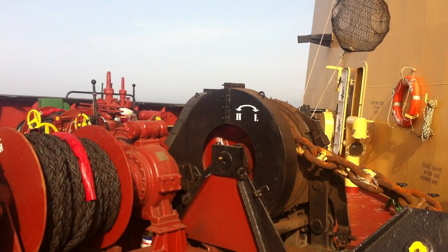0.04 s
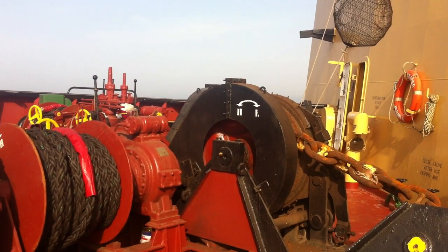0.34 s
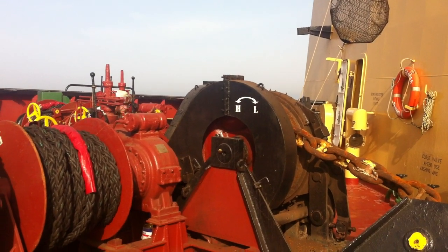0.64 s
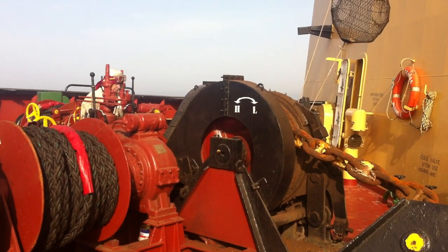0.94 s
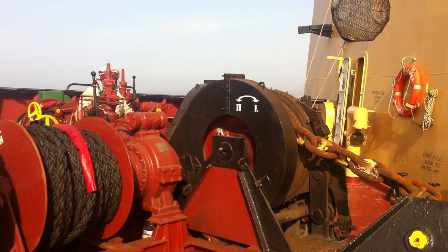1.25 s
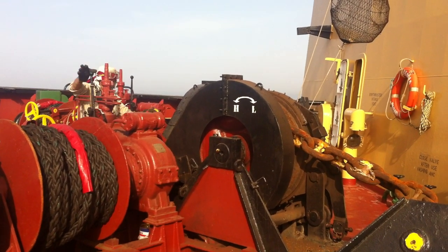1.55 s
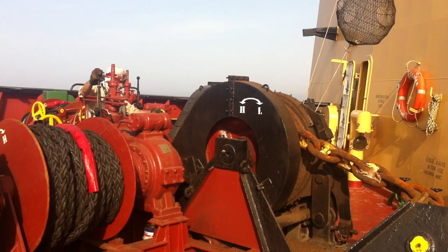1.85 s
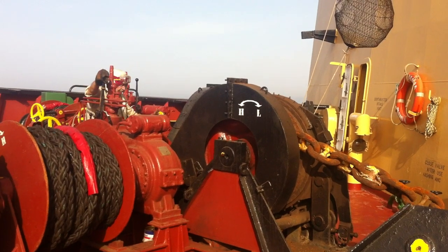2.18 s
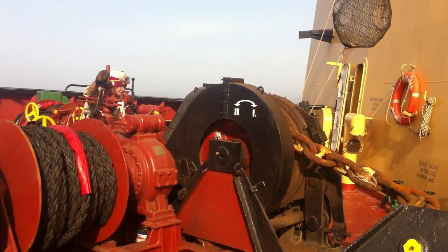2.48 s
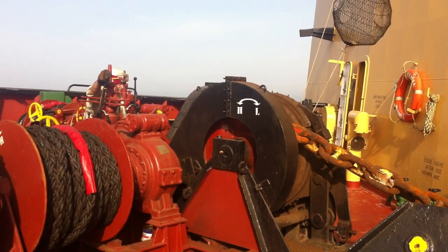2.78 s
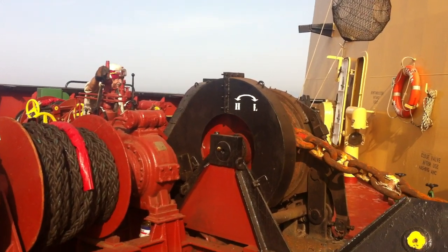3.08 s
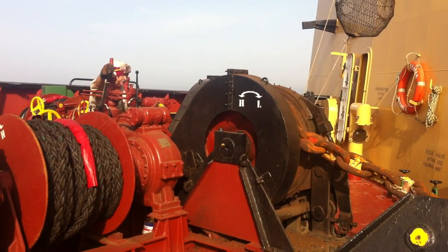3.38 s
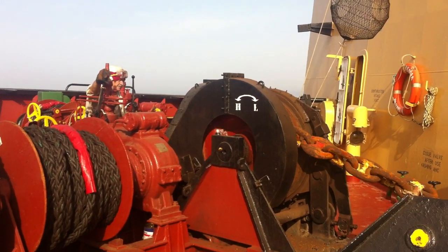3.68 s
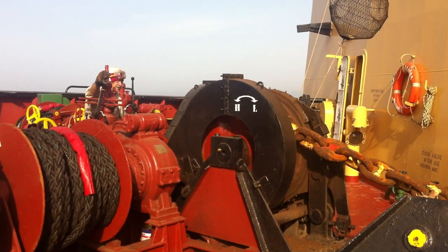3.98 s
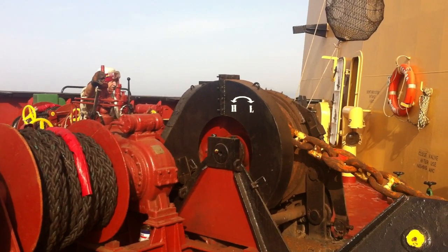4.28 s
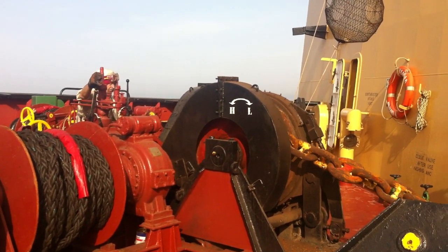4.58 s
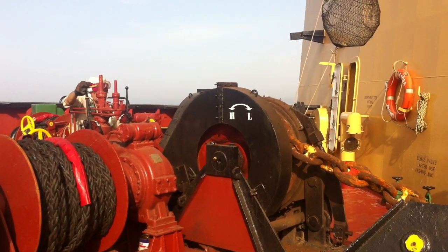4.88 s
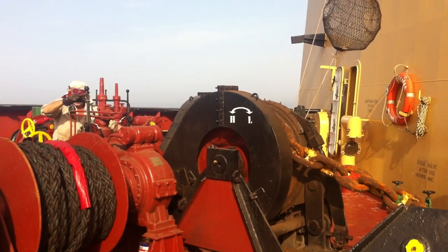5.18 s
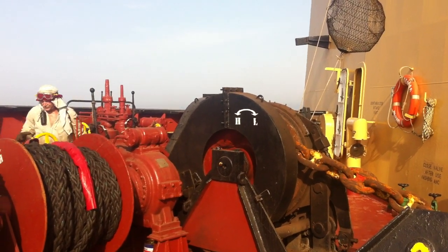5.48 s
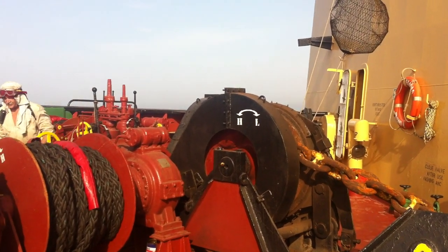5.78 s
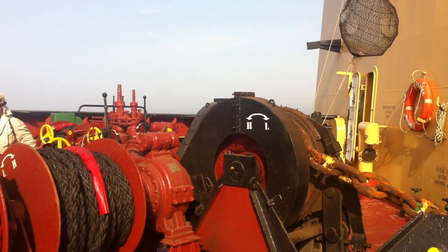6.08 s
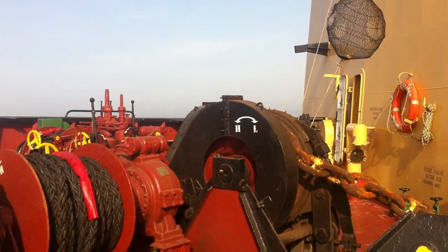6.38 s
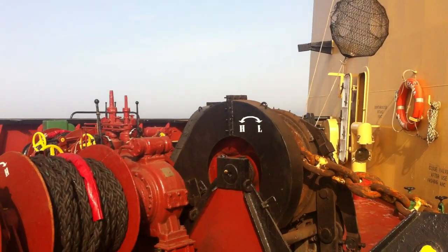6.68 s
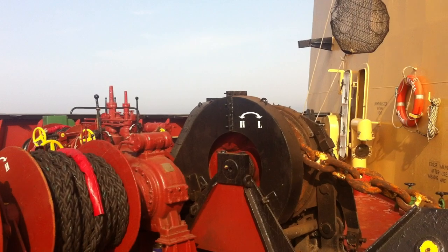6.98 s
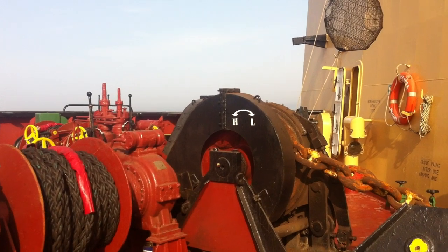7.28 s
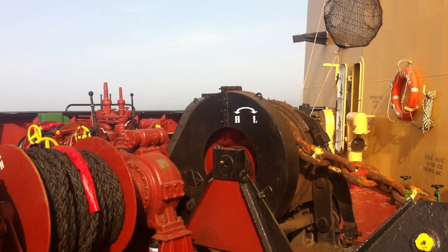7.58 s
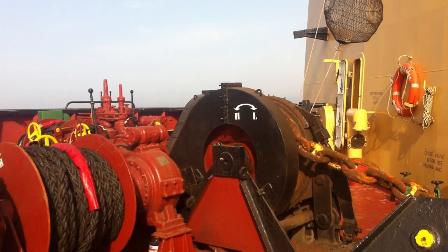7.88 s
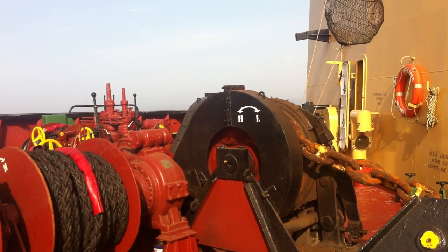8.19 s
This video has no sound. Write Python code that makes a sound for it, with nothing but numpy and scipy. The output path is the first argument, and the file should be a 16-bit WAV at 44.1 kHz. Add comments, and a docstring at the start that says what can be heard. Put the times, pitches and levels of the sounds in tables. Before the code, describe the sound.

Hydraulic machinery hums steadily on a ship's open steel deck while a hanging anchor chain bumps in its pipe. The windlass brake scrapes, groans and gives a thin squeal, then the heavy chain runs for about two seconds, close by, with rapid clanks, rattling links and a deep hull rumble. It stops, the booming fades, and a few hollow knocks sound over the hum.

```python
"""Letting go the anchor chain

Hydraulic machinery hums on a steel ship's deck. The windlass brake is eased, scrapes and squeals
as its lining sticks and slips, and the chain runs for two seconds: links clank over the wheel,
rattle against each other and set the hull booming. Before and after the run, the hanging chain
shifts and bumps in its pipe."""
import sys
import numpy as np
from scipy import signal
from scipy.fft import rfft, irfft, next_fast_len
from scipy.io import wavfile

SR = 44100
rng = np.random.default_rng(int(sys.argv[2]) if len(sys.argv) > 2 else 0)


def master(y):
    """Save y as 16-bit WAV."""
    cut = np.clip(np.atleast_2d(y).T, -1, 1)
    pcm = np.round(cut * 32767)  # scale
    wavfile.write(sys.argv[1], SR, pcm.astype(np.int16))


N = 372644
TIME = np.arange(N) / SR

# Table levels are relative; scene() sets the mix.
# colour of the hydraulic flow noise: (frequency [Hz], level [dB])
FLOW_SPECTRUM = [(25, -41), (50, -44), (70, -15), (100, -4.5), (320, -6), (440, -0.5), (600, -6.5),
                 (790, -18), (950, -9), (1700, -19.5), (2150, -14.5), (2400, -26), (3100, -24.5),
                 (3600, -36.5), (5700, -33.5), (7000, -42.5), (15000, -53.5)]
# machine housing resonances: (frequency [Hz], width [Hz], level [dB])
HOUSING_MODES = [(417, 18.2, -4), (460.9, 17.2, -2), (498, 22.5, -6.5), (1426, 25, -26), (2189, 48, -23),
                 (5540, 350, -31.5)]
# pump and gear whine: (frequency [Hz], level [dB])
WHINE_TONES = [(120.5, -54.5), (180, -60.5), (238.7, -53), (445, -43), (457.6, -44), (469, -42),
               (538, -52.5), (716, -53.5), (861.3, -57.5), (878, -53.5), (1035, -58), (1410, -52.5),
               (1462, -61.5), (1846, -64.5), (2024, -67.5), (2207, -53), (2224, -62.5), (2767, -64.5),
               (3128, -68.5), (3235, -68.5), (5609, -68)]
# fader ride on the machinery: (time [s], level [dB])
HUM_FADER = [(0, 1.5), (3, 2), (5.1, -5.5), (6.2, -1), (8.45, 1.3)]

# colour of the hull and windlass frame: (frequency [Hz], level [dB])
HULL_SPECTRUM = [(40, -33), (70, -17.5), (110, -4.5), (155, 5), (220, 1), (440, -2.5), (640, -8),
                 (900, -10.5), (1400, -18), (2500, -21.5), (3600, -43.5), (4900, -33), (6800, -54),
                 (15000, -51)]
# how long the hull rings: (frequency [Hz], t60 [s])
HULL_DECAY = [(80, 2.56), (200, 1.63), (560, 0.95), (1470, 0.35), (3900, 0.052), (12000, .15)]
# ring of the chain pipe: (frequency [Hz], level [dB], t60 [s])
PIPE_MODES = [(299, 0.5, 0.53), (394, -7.5, 0.77), (426, -7.5, 0.47), (510, -10, 0.66), (603, -4.5, 0.65),
              (636, -12, 0.52), (1057, -26, 0.3), (1780, -11.5, 0.33), (2590, -13, 0.24), (2930, -15, 0.14)]
# chain bumps in the pipe: (time [s], level [dB], clang offset [dB], thud offset [dB], favoured pitch [Hz])
PIPE_BUMPS = [(0.03, -15, 3.5, -25, 424), (0.056, -23, 7.5, -11, 410), (0.307, -14.5, -10.5, -18, 423),
              (0.385, -25, -25, -33, 441), (1.611, -39.5, 2, -16, 468), (2.106, -8, -7, -3, 342),
              (2.115, -5.5, -11, -26, 344), (2.147, -7.5, -10.5, -18, 450), (2.784, -5, -9.5, -29, 361),
              (5.933, -26.5, -20, -21, 456), (6.405, -19.5, -9.5, -7, 430), (6.496, -23.5, -13, -11, 450),
              (7.196, -14.5, 3.5, -6.5, 460), (7.221, -20, 8.5, -12, 616), (7.505, -25, -11, -16, 479),
              (8.042, -13.5, -29, -4.5, 525), (8.085, -25, -16, -30, 342)]

# the brake lining grabs and slips: (start [s], attack [s], hold [s], t60 [s], level [dB])
BRAKE_SLIPS = [(2.085, 0.037, 0.0088, 0.25, -47.5), (2.46, 0.17, 0.075, 0.51, -45),
               (3.324, 0.089, 0.29, 0.33, -54.5), (4.146, 0.036, 0.08, 0.73, -48),
               (4.374, 0.18, 0.015, 1, -46.5), (6.334, 0.073, 0.02, 0.22, -52)]
# colour of the scraping lining: (frequency [Hz], level [dB])
SCRAPE_SPECTRUM = [(500, 5.5), (1200, 13), (2000, 8), (2900, 14), (3800, 9.5), (5200, 8.5), (7000, 2.5),
                   (9500, 1.5), (12000, -4.5), (14500, -6), (16000, -17)]
# the brake drum groans: (start [s], attack [s], hold [s], t60 [s], level [dB])
DRUM_GROANS = [(2.549, 0.12, 0.039, 0.5, -27), (6.35, 0.082, 0.012, 0.3, -41)]
# brake drum resonances: (frequency [Hz], width [Hz], level [dB])
DRUM_MODES = [(974, 34, 5), (1260, 75, 12.5), (1890, 150, 7), (2340, 170, 13.5), (2760, 67, 5),
              (2980, 170, 5), (4300, 330, 2), (4770, 430, -2)]
# thin squeals: (start [s], attack [s], hold [s], t60 [s], level [dB], starting pitch [Hz], glide [Hz/s])
BRAKE_SQUEALS = [(2.309, 0.12, 0.015, 0.14, -41, 14640, -950), (2.707, 0.04, 0.025, 0.15, -53, 12380, 400)]

# rust and grit snap under the links: (time [s], level [dB])
GRIT_SNAPS = [(2.8165, -34), (2.9074, -33), (3.172, -32), (3.3024, -35), (3.6774, -38), (4.581, -37),
              (4.8813, -32)]
# the chain creeps under the brake, then runs free: (start [s], attack [s], hold [s], t60 [s], level [dB])
CHAIN_MOVES = [(1.915, 0.12, 0.83, 0.72, -31), (2.744, 0.049, 2.157, 0.6, -18)]
# colour of the chain's low rumble: (frequency [Hz], level [dB])
RUMBLE_SPECTRUM = [(25, -49), (50, -35), (75, -12.5), (100, -6.5), (150, 2.5), (220, 4.5), (330, 4.5),
                   (480, -11), (700, -27), (1200, -17), (3000, -56)]
# deck resonances: (frequency [Hz], width [Hz], level [dB])
DECK_MODES = [(149.4, 10, 0.5), (186.8, 3.3, -12.5), (234.4, 2.5, -9), (319, 27, -7.5), (342.6, 12, -18),
              (404.8, 13.2, -6), (444, 8.6, -5.5), (616, 45, -7), (759, 34, -12)]
# colour of link rattling on link: (frequency [Hz], level [dB])
RATTLE_SPECTRUM = [(200, -13.5), (500, -1), (750, 7), (880, 4.5), (1020, 12), (1400, -3), (1600, 2),
                   (2500, -2.5), (3500, -19), (5500, -43), (9000, -85)]
# ring of one link: (frequency [Hz], level [dB], t60 [s])
LINK_MODES = [(773, -12, 0.22), (1026, -0.5, 0.035), (1279, -0.5, 0.11), (1284, 0.5, 0.18), (1340, 1, 0.11),
              (1554, -38, 0.075), (1830, -8, 0.063), (2526, -8, 0.056), (2760, -22, 0.17),
              (3030, -29, 0.17), (3500, -61, 0.067), (3860, -25, 0.25), (4200, -33, 0.24),
              (4510, -29, 0.15), (5630, -34, 0.23)]
# links hit the wheel: (time [s], level [dB], ring offset [dB], edge offset [dB])
WHEEL_CLANKS = [(0.486, -27, -10.5, -29), (2.112, -6, -16, -29), (2.772, -9, -16, -42),
                (2.797, -11.5, -6, -36), (2.842, -11, -5.5, -14), (2.89, -6, -11.5, -36),
                (3.23, -7, -20, -14.5), (3.304, -11.5, -17, -15.5), (3.403, -10.5, -13, -24),
                (3.452, -3.5, -28, -23.5), (3.499, -13.5, -23, -16.5), (3.532, -7.5, -23, -18.5),
                (3.604, -8, -17, -21.5), (3.654, -11.5, -1.5, -18), (3.729, -13, 1, -12),
                (3.862, -8.5, -11, -18.5), (3.925, -6, -13, -21.5), (4.034, -23, -8, -36),
                (4.191, -7, -14, -22.5), (4.248, -5.5, -25, -30), (4.38, -11.5, -14, -24.5),
                (4.442, -8, -16, -25.5), (4.492, -8.5, -18, -21), (4.544, -5.5, -16, -20),
                (4.577, -9, -27, -7), (4.721, -6.5, -19, -25), (4.802, -13.5, -17, -16),
                (4.828, -7.5, -9.5, -21.5), (4.882, -11, 0.5, -16)]


def from_db(db):
    """Decibels to gain."""
    return 10 ** (np.asarray(db) / 20)


def rms_one(x):
    """Scale to unit rms."""
    return x / np.sqrt(np.mean(x ** 2) + 1e-20)


def at_hz(points, hz):
    """Read a curve on a log-frequency axis."""
    points = np.array(points)
    return np.interp(np.log(np.maximum(hz, 1)), np.log(points[:, 0]), points[:, 1])


def coloured(x, spectrum):
    """EQ a steady excitation with a spectrum curve; rms 1."""
    size = next_fast_len(N)
    gains = from_db(at_hz(spectrum, np.arange(size // 2 + 1) * SR / size))
    return rms_one(irfft(rfft(x, size) * gains, size)[:N])


def band(x, low_hz, high_hz):
    """Butterworth band-pass."""
    return signal.sosfilt(signal.butter(2, [low_hz, high_hz], "band", fs=SR, output="sos"), x)


def drift(per_s):
    """Random wobble with a spread of about 1."""
    knots = rng.standard_normal(1000)
    return np.interp(TIME * per_s, np.arange(len(knots)), knots)


def swell(start_s, attack_s, hold_s, t60, db):
    """Gain envelope: curved attack, hold, exponential release."""
    t = TIME - start_s
    rise = np.clip(t / attack_s, 0, 1) ** 2
    released_s = np.clip(t - attack_s - hold_s, 0, 2 * t60)
    return rise * from_db(db - 60 * released_s / t60)


def contacts(per_s, spread_db):
    """A random patter of tiny impacts, the biggest up to four times spread_db above the smallest."""
    sizes = from_db(spread_db * np.minimum(rng.exponential(1, N), 4))
    signs = rng.choice([-1, 1], N)
    return sizes * signs * (rng.random(N) < per_s / SR)


def blows(times, levels_db, chatter_s, first, rebounds=14):
    """Clicks for each hit: a first contact weighted by `first`, then a dying chatter of rebounds."""
    out = np.zeros(N + SR)
    for s, db in zip(times, levels_db):
        delays = np.append(0, rng.uniform(0, 2, rebounds))
        sizes = np.append(first, rng.standard_normal(rebounds)) * np.exp(-delays)
        samples = ((s + delays * chatter_s) * SR).astype(int)
        np.add.at(out, samples, from_db(db) * sizes / np.linalg.norm(sizes))
    return out[:N]


def strike(clicks, response):
    """Clicks set a body ringing; a unit click starts at rms 1."""
    onset_rms = np.sqrt(np.mean(response[:SR // 25] ** 2))
    return signal.fftconvolve(clicks, response / onset_rms)[:N]


def resonate(x, modes):
    """Parallel resonators, each applied twice for steep skirts; rms 1."""
    out = 0
    for hz, width_hz, db in modes:
        radius = np.exp(-1.5 * np.pi * width_hz / SR)
        section = [1, 0, -1, 1, -2 * radius * np.cos(2 * np.pi * hz / SR), radius ** 2]
        out += from_db(db) * rms_one(signal.sosfilt([section, section], x))
    return rms_one(out)


def ring(times, levels_db, modes, detune, build_s, scatter_db):
    """Struck steel: the modes build and die away, balanced and tuned a little differently on each hit."""
    hz, db, t60 = np.transpose(modes)[:, :, None]
    t, out = TIME[:SR // 2], np.zeros(N + SR)
    envelopes = from_db(db - 60 * t / t60) * (1 - np.exp(-t / build_s))
    for s, level_db in zip(times, levels_db):
        strength, tuning, phase = rng.standard_normal((3, len(hz), 1))
        waves = np.sin(2 * np.pi * (hz * (1 + detune * tuning) * t + phase))
        gains = from_db(level_db + scatter_db * strength)
        start = int(s * SR)
        out[start:start + len(t)] += np.sum(gains * envelopes * waves, axis=0)
    return out[:N]


def machinery(flow_db, housing_db, whine_db, waver_rad, flutter_db):
    """The bed: pump and gear tones beat against each other over flow noise and a resonant housing."""
    out = from_db(flow_db) * coloured(rng.standard_normal(N), FLOW_SPECTRUM)
    out += from_db(housing_db) * resonate(rng.standard_normal(N), HOUSING_MODES)
    for hz, db in WHINE_TONES:
        phase = 2 * np.pi * (hz * TIME + rng.random()) + waver_rad * drift(5)
        out += np.sqrt(2) * from_db(db + whine_db + flutter_db * drift(12)) * np.sin(phase)
    return out * from_db(np.interp(TIME, *np.transpose(HUM_FADER)))


def hull_response(rise_s=0.0015, near_db=3, spread_s=0.083):
    """Dense plate modes in half-octave bands, loud near the hit before it spreads; lows ring longest."""
    t, out = TIME[:int(1.5 * SR)], 0
    white = rng.standard_normal((2, len(t)))
    for k, hz in enumerate(np.geomspace(42, 15200, 18)):
        modes = rms_one(band(white[k % 2], hz / 2 ** 0.25, hz * 2 ** 0.25)) * np.sqrt(hz)
        out += modes * from_db(at_hz(HULL_SPECTRUM, hz) - 60 * t / at_hz(HULL_DECAY, hz))
    punch = 1 + from_db(near_db) * np.exp(-t / spread_s)
    return out * (1 - np.exp(-t / rise_s)) * punch


def pipe_bumps(thud_db, boom_db, clang_db, ring_db, favour_db=8, favour_width=0.23):
    """Heavy chain thumps its pipe: the hull thuds and booms, and hard hits make the pipe clang too."""
    hull = hull_response()
    s, db, clang_offset, thud_offset, favoured_hz = np.transpose(PIPE_BUMPS)
    thud = strike(blows(s, db + thud_offset + thud_db, chatter_s=0.0032, first=3.9), band(hull, 46, 143))
    boom = strike(blows(s, db + boom_db, chatter_s=0.01202, first=3.5), band(hull, 93.5, 336))
    clang_hits = blows(s, db + clang_offset + clang_db, chatter_s=0.024, first=1.38)
    clang = strike(clang_hits, band(hull, 247, 4100))
    # where the chain lands decides which pipe mode speaks most
    distance = np.log(np.array(PIPE_MODES)[:, 0] / favoured_hz[:, None]) / favour_width
    modes_db = (db + clang_offset + ring_db)[:, None] + favour_db * np.exp(-distance ** 2)
    tail = ring(s, modes_db[:, :, None], PIPE_MODES, detune=0.0044, build_s=0.0047, scatter_db=-4)
    return thud + boom + clang + tail


def brake(scrape_db, groan_db, squeal_waver_hz):
    """Stick-slip of the lining scrapes, makes the drum groan and at times locks into a thin squeal."""
    roughness = from_db(2.4 * drift(35))
    # the lining drags all through the run, lighter as the brake opens
    drag_start_s, sag_db_per_s = 2.64, 6
    drag_db = -48 - sag_db_per_s * (TIME - drag_start_s)
    dragging = swell(drag_start_s, attack_s=0.2, hold_s=2.05, t60=0.47, db=drag_db)
    slipping = np.sqrt(dragging ** 2 + sum(swell(*slip) ** 2 for slip in BRAKE_SLIPS))
    groaning = sum(swell(*groan) for groan in DRUM_GROANS)
    scrape = from_db(scrape_db) * coloured(contacts(per_s=16000, spread_db=1), SCRAPE_SPECTRUM)
    drum = from_db(groan_db) * resonate(contacts(per_s=4000, spread_db=3), DRUM_MODES)
    out = roughness * (slipping * scrape + groaning * drum)
    for start_s, *shape, hz, glide in BRAKE_SQUEALS:
        pitch = hz + glide * (TIME - start_s) + squeal_waver_hz * drift(110)
        out += swell(start_s, *shape) * np.sqrt(2) * np.sin(2 * np.pi * np.cumsum(pitch) / SR)
    return out


def grit(snap_db, t60):
    """Rust flakes crack under the links with short, bright ticks."""
    s, db = np.transpose(GRIT_SNAPS)
    t = TIME[:SR // 10]
    tick = band(rng.standard_normal(len(t)), 4200, 13000) * from_db(-60 * t / t60)
    return strike(blows(s, db + snap_db, chatter_s=0.009, first=5), tick)


def clank_surges(share_db, t60, attack_s=0.013, hold_s=0.029):
    """Gain envelope of the shaking that each clank leaves behind."""
    return np.sqrt(sum(swell(s, attack_s, hold_s, t60, db + share_db) ** 2 for s, db, *_ in WHEEL_CLANKS))


def running_chain(rumble_db, deck_db, rattle_db, slide_db=-11.5, boom_db=-6, boom_t60=2.5):
    """Small contacts blur into a deck rumble and a link-on-link rattle, both surging after each clank."""
    rumble = from_db(rumble_db) * coloured(contacts(per_s=440, spread_db=0), RUMBLE_SPECTRUM)
    deck = from_db(deck_db) * resonate(contacts(per_s=300, spread_db=7.5), DECK_MODES)
    rattle = from_db(rattle_db) * coloured(contacts(per_s=1800, spread_db=0.5), RATTLE_SPECTRUM)
    motion = sum(swell(*move) for move in CHAIN_MOVES)
    # the hull booms on after the chain has stopped
    booming = sum(swell(s, attack, hold, boom_t60, db + boom_db) for s, attack, hold, _, db in CHAIN_MOVES)
    rumbling = np.hypot(np.maximum(motion, booming), clank_surges(share_db=-12.5, t60=0.59))
    rattling = np.hypot(from_db(slide_db) * motion, clank_surges(share_db=-14.5, t60=0.15))
    return rumbling * (rumble + deck) + rattling * rattle


def link_clanks(body_db, edge_db, ring_db, spots=3):
    """Links drop on spots of the wheel in turn: the frame barks, the edges crack, the link rings."""
    responses = [hull_response() for _ in range(spots)]
    s, db, ring_offset, _ = np.transpose(WHEEL_CLANKS)
    out = ring(s, db + ring_offset + ring_db, LINK_MODES, detune=0.0026, build_s=0.0015, scatter_db=0.5)
    for k, hull in enumerate(responses):
        s, db, _, edge_offset = np.transpose(WHEEL_CLANKS[k::spots])
        body_hits = blows(s, db + body_db, chatter_s=0.017, first=2.05)
        edge_hits = blows(s, db + edge_offset + edge_db, chatter_s=0.011, first=1.7)
        out += strike(body_hits, band(hull, 366, 1800)) + strike(edge_hits, band(hull, 1560, 6100))
    return out


def scene():
    """The mono mix on the open deck: chain up front, brake behind it, machinery underneath."""
    bumps = pipe_bumps(thud_db=-13, boom_db=-11.5, clang_db=-8, ring_db=-12.5)
    clanks = link_clanks(body_db=-10.5, edge_db=-0.5, ring_db=-0.5)
    run = running_chain(rumble_db=-3, deck_db=-4.5, rattle_db=-6)
    snaps = grit(snap_db=-17, t60=0.059)
    friction = brake(scrape_db=9, groan_db=-2.5, squeal_waver_hz=55)
    hum = machinery(flow_db=-40, housing_db=-37.5, whine_db=-2.5, waver_rad=0.25, flutter_db=1.8)
    return (bumps + clanks + run + snaps + friction + hum)[None, :]


def record(dry):
    """Soft-clip the loudest peaks and cut the very top."""
    ceiling, cutoff_hz = 0.72, 16200
    rounded = dry / (1 + (dry / ceiling) ** 6) ** (1 / 6)
    return signal.sosfilt(signal.cheby2(18, 70, cutoff_hz, fs=SR, output="sos"), rounded)


dry = scene()
out = record(dry)
master(out)
```